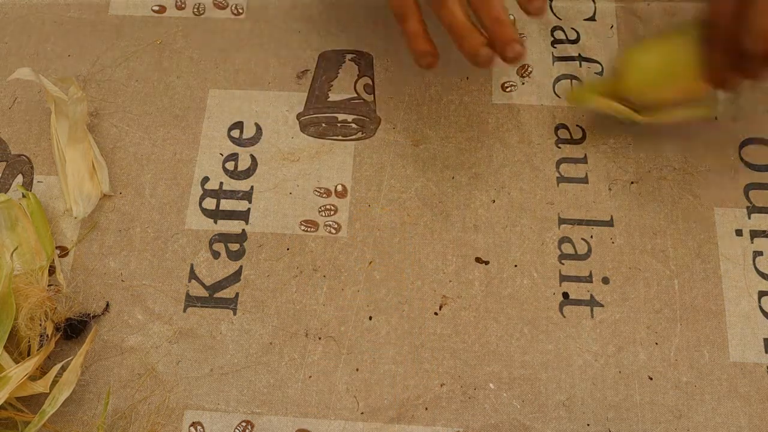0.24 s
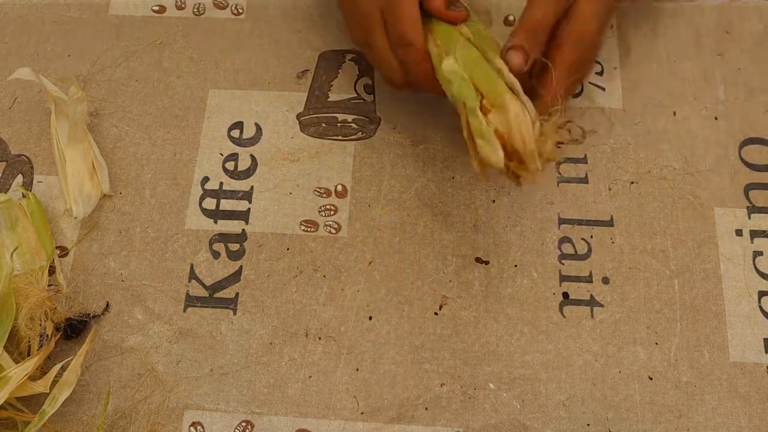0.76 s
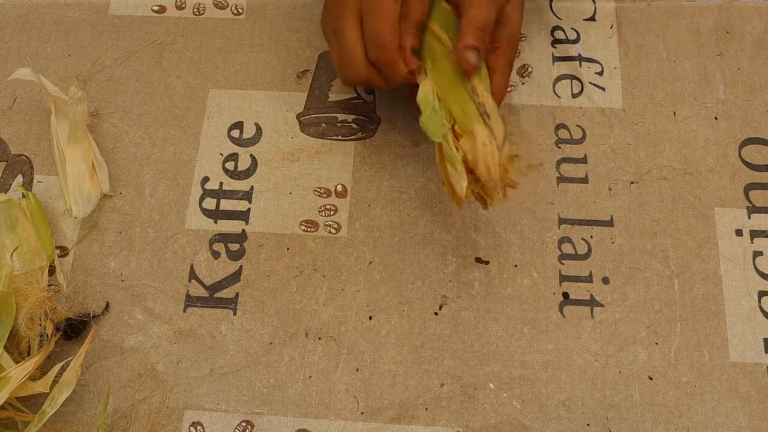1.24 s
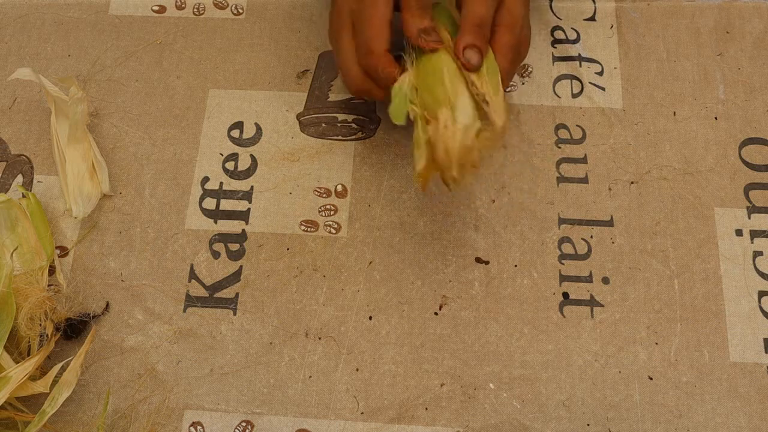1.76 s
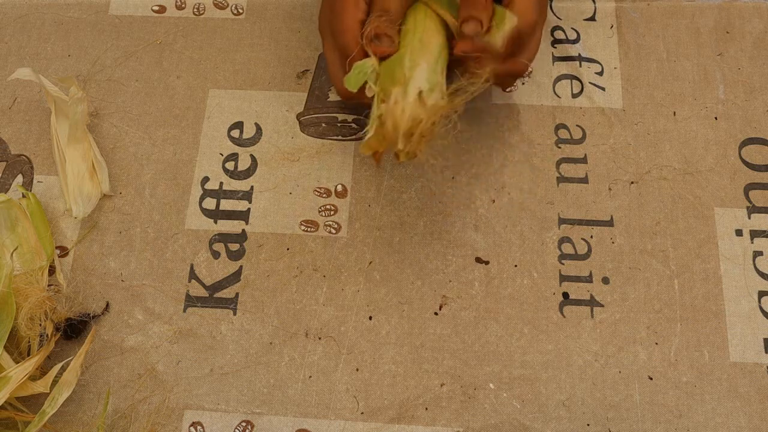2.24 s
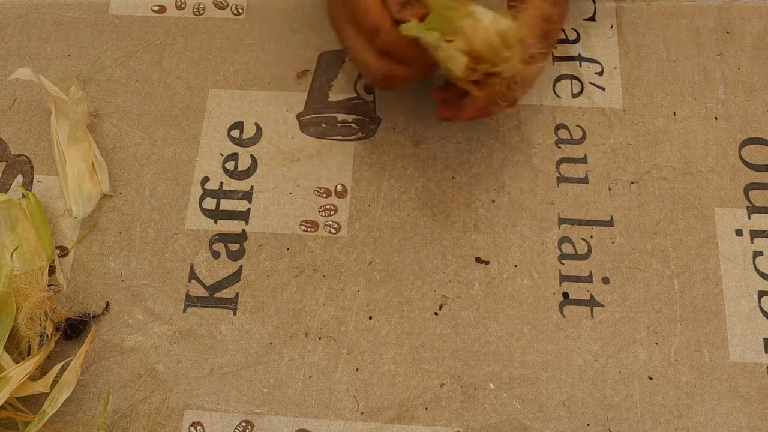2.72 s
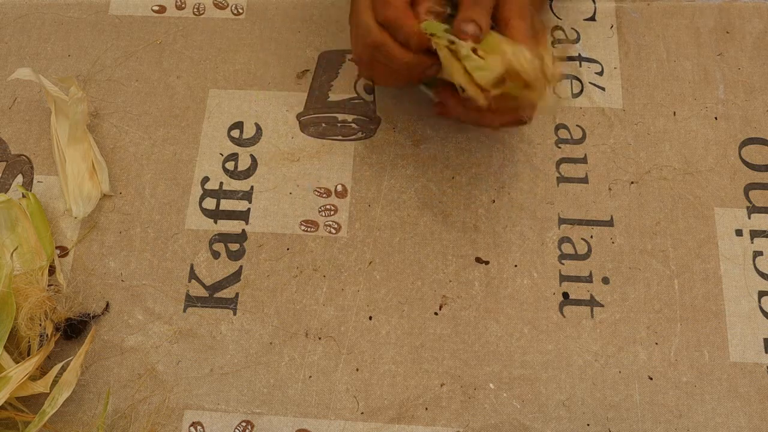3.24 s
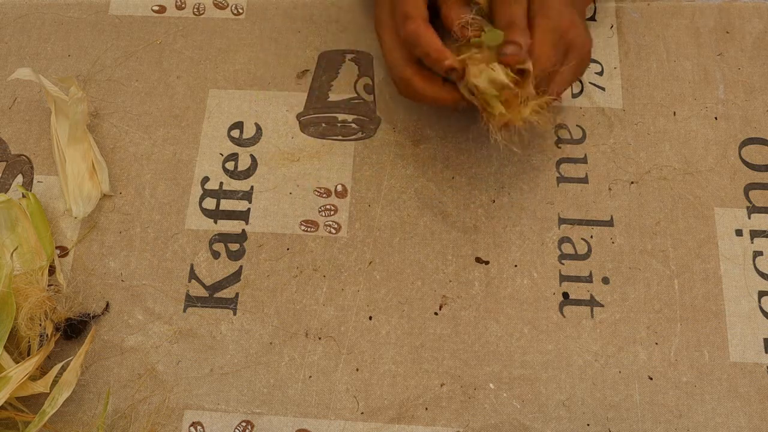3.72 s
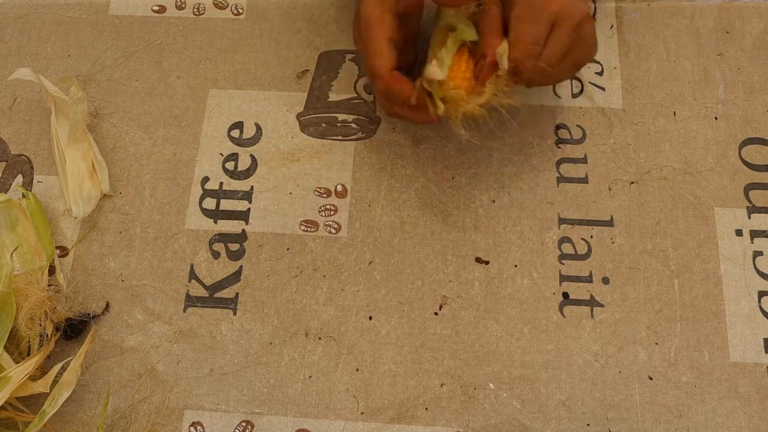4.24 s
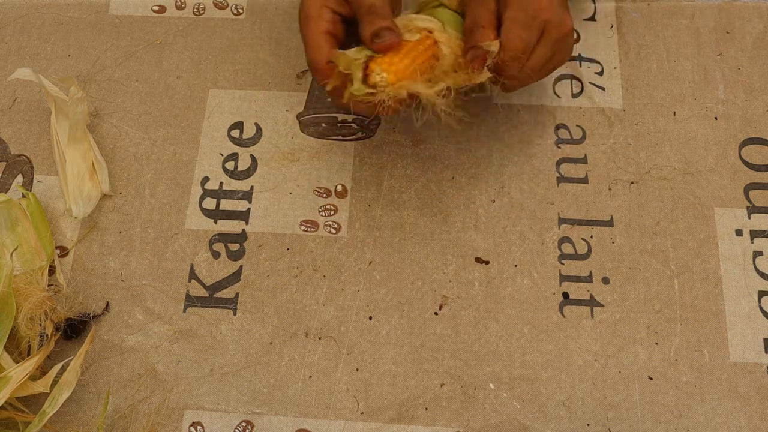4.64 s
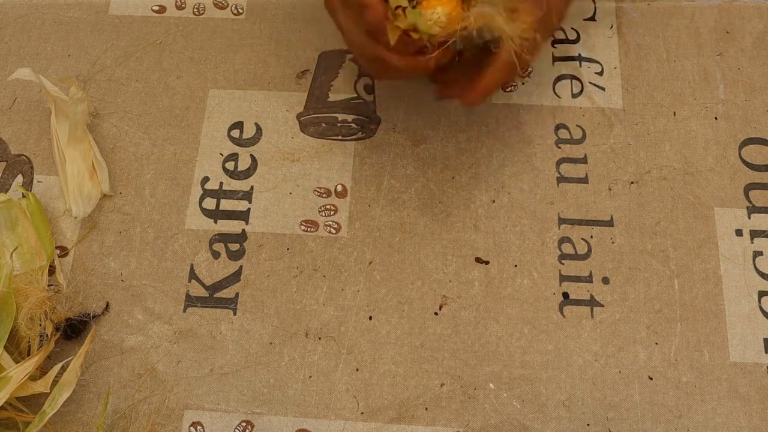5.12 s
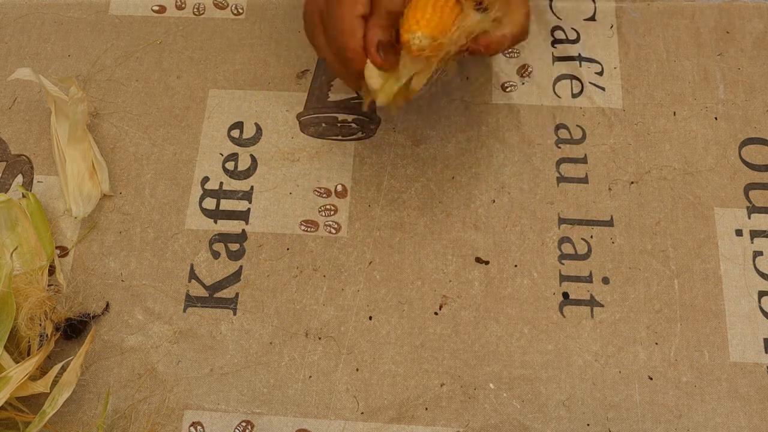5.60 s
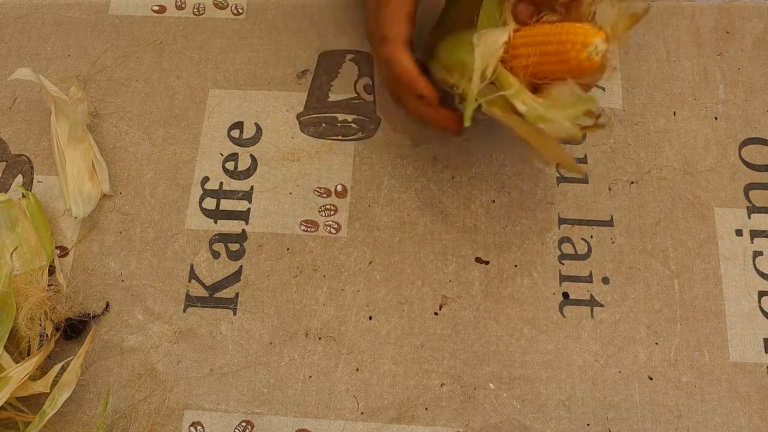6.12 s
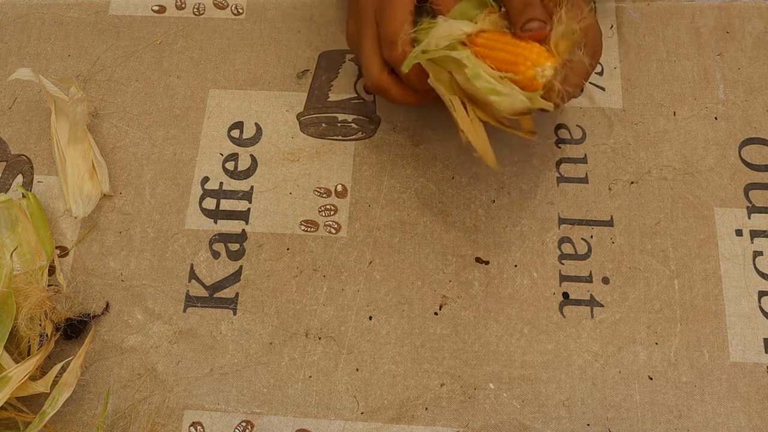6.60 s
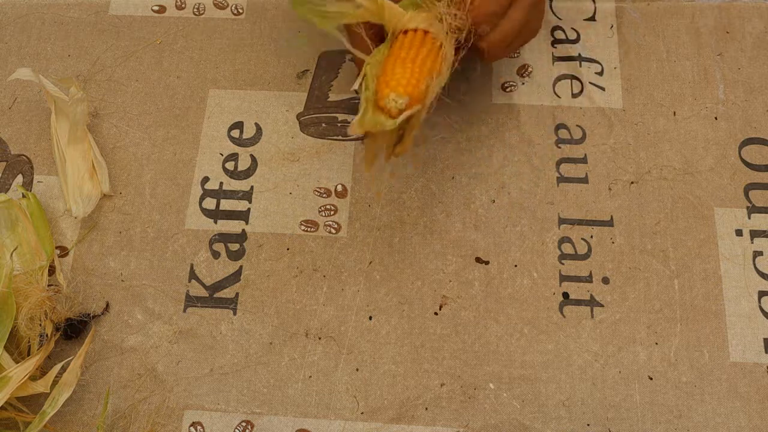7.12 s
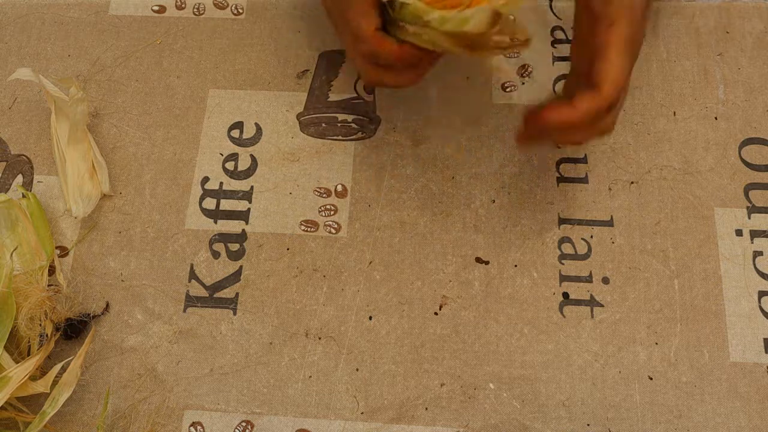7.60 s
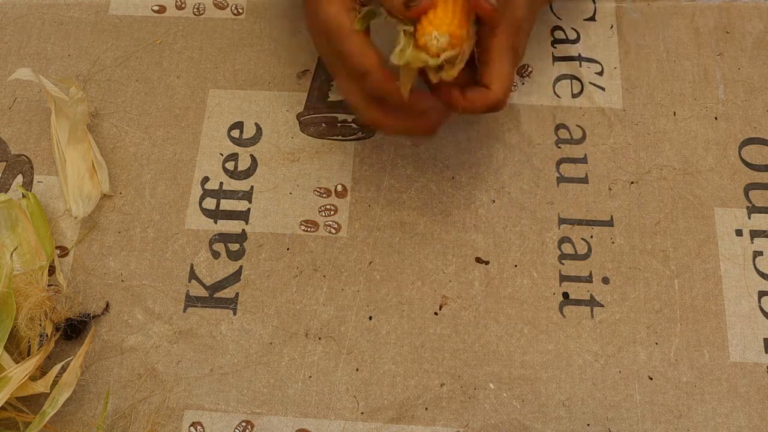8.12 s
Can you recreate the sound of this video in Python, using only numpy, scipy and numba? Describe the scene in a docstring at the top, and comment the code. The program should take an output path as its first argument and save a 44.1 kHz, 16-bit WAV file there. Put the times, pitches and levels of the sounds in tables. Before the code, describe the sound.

Close, crisp leafy crackling in uneven pulls, stiff husk veins snapping loudly now and then, faint low thuds from wrists on a table, indoors.

```python
"""Dry husks rustle, crackle and snap as hands peel a corn cob above a table, close up in a quiet room.
Thousands of tiny fibre cracks make the rustle, and the cupped leaves ring near 1 kHz as resonant noise.
Stiff veins snap as noise bursts with short rings; ticks are tiny wavelets, scrapes and a tear filtered hiss.
Wrists knock the table as decaying sines, its frame sways at its lowest mode and rumbles, over room hush."""
import sys
import numpy as np
from scipy import signal
from scipy.fft import rfft, irfft
from scipy.io import wavfile
from scipy.ndimage import uniform_filter1d
from numba import njit

SR = 44100
rng = np.random.default_rng(int(sys.argv[2]) if len(sys.argv) > 2 else 0)


def store_pcm(level_fs):
    """Save levels as 16-bit WAV."""
    pcm = np.round(np.clip(level_fs, -1, 1) * 32767).astype(np.int16)
    wavfile.write(sys.argv[1], SR, np.atleast_2d(pcm).T)


def undo_db(level):
    """Turn decibels back into plain size, where 20 dB means ten times bigger."""
    steps = np.asarray(level, float) / 20
    return 10 ** steps


N = 368235

# brightness given to crackle and snaps: (frequency [Hz], gain [dB])
HUSK_COLOUR = [(180, -33), (400, -2), (1000, -6.5), (2000, -5.5), (3900, 0), (4550, -3), (5900, 0.5),
               (6900, -2.5), (7800, 0), (9500, -5), (10600, -7.5), (12500, -6.5), (15600, -5), (16400, -45)]
# wrists on the table: (time [s], level [dB], struck-spot ring [Hz], t60 [s], board mode over that ring [dB])
WRIST_KNOCKS = [(0.018, -34, 154, 0.094, -9), (.395, -38, 105, 0.11, -28), (.81, -38.5, 96, 0.13, -25),
                (1.826, -30, 249, 0.063, -9), (1.841, -32, 284, 0.1, -15), (1.852, -22.5, 191, 0.08, -11.5),
                (2.526, -29, 600, 0.03, -12), (2.595, -30.5, 397, 0.045, -8),
                (2.969, -25.5, 494, 0.035, -12), (3.928, -35, 137, 0.077, -14),
                (4.057, -33, 108, 0.12, -17), (4.469, -36, 72, 0.12, -31), (4.619, -24, 204, 0.082, -7),
                (5.344, -35, 71, 0.26, -10), (7.102, -24.5, 204, 0.089, -5), (7.238, -34, 280, 0.029, 0.5),
                (7.979, -21, 120, 0.15, -28), (8.028, -29, 80.7, 0.15, -27)]
BOARD_HZ = 331


def level(x, db):
    """Set the rms level."""
    return x * undo_db(db) / np.sqrt(np.mean(x ** 2))


def curve(points):
    """Interpolate the columns of a table sample by sample; the first column is time."""
    s, *columns = np.transpose(points)
    return [np.interp(np.arange(N) / SR, s, c) for c in columns]


def colour(x, points, size=1024):
    """Causal filter through (Hz, dB) points, from the folded cepstrum."""
    hz, db = np.transpose(points)
    bins_hz = np.fft.rfftfreq(size, 1 / SR)
    gain = undo_db(np.interp(np.log(bins_hz + 1), np.log(hz), db))
    ceps = irfft(np.log(gain))
    ceps[1:size // 2] *= 2
    ceps[size // 2 + 1:] = 0
    impulse = irfft(np.exp(rfft(ceps)))
    return signal.fftconvolve(x, impulse)[:len(x)]


def band(x, hz, width_hz):
    """One resonance."""
    return signal.lfilter(*signal.iirpeak(hz, hz / width_hz, fs=SR), x)


def walk(rate):
    """Random levels held 1 / rate s and slewed; spread near 1."""
    hold = int(SR / rate)
    steps = np.repeat(rng.standard_normal(N // hold + 1), hold)
    return uniform_filter1d(steps, hold // 2)[:N]


def add(out, s, sound):
    """Mix a short sound in at time s."""
    i = int(s * SR)
    out[i:i + len(sound)] += sound[:len(out) - i]


def swells(peak_s, rise_s, fall_s, db):
    """Power-summed gain of swells, each 20 dB down one rise before and one fall after its rounded peak."""
    t = np.arange(0, N + 64, 64) / SR
    power = 0
    for s, rise, fall, top_db in np.broadcast(peak_s, rise_s, fall_s, db):
        away = np.abs(t - s) / np.where(t < s, rise, fall)
        power = power + undo_db(top_db - 20 * away ** 1.39) ** 2  # higher exponent = rounder top
    return np.interp(np.arange(N) / SR, t, np.sqrt(power))


@njit
def grains(start, hz, cycles, size):
    """Each crack is a wavelet of a few cycles at its own pitch that swells and dies."""
    out = np.zeros(N + 2000)
    for k in range(len(start)):
        decay = hz[k] / cycles[k] / SR
        turn = np.exp(2j * np.pi * hz[k] / SR - decay)
        z = size[k] + 0j
        for i in range(min(int(8 / decay), 2000)):
            out[start[k] + i] += i * decay * z.imag
            z *= turn
    return out[:N]


@njit
def sweep(x, hz, q):
    """Band-pass whose centre moves: a state-variable filter."""
    y, b, l = np.empty(len(x)), 0., 0.
    for i in range(len(x)):
        g = np.tan(np.pi * hz[i] / SR)
        v = (b + g * (x[i] - l)) / (1 + g * (g + 1 / q))
        b, l, y[i] = 2 * v - b, l + 2 * g * v, v / q
    return y


def cracks(rate, low_hz, high_hz, spread_db, cycles, flurry_db):
    """Fibres crack at random times and pitches, rate per second, in flurries; a few are far larger."""
    when, pitch, chance, length = rng.random((int(rate * N / SR), 4)).T
    start = (when * N).astype(np.int64)
    hz = low_hz + (high_hz - low_hz) * pitch
    size_db = spread_db * np.minimum(-np.log(chance), 4)
    flurry = flurry_db * np.clip(walk(70), -2, 1)[start]
    size = undo_db(size_db + flurry) * np.sqrt(hz)  # offsets the shorter life of high cracks
    return level(grains(start, hz, cycles * (.5 + length), size), 0)


def rubbing(patchy_db):
    """Skin slides on leaf: hiss whose regions of the spectrum come and go apart."""
    patches = 0
    for hz in range(700, 16300, 1300):
        patches = patches + undo_db(patchy_db * walk(11)) * band(rng.standard_normal(N), hz, 1100)
    return level(patches, 0)


def leaf_crackle():
    """Dense fine cracks, rubbing hiss and larger stray ticks, with a bright, notched colour."""
    fine = cracks(rate=4000, low_hz=663, high_hz=16320, spread_db=2.0, cycles=1.44, flurry_db=4.5)
    strays = cracks(rate=60, low_hz=3000, high_hz=14000, spread_db=4.5, cycles=.8, flurry_db=1.5)
    mix = fine + undo_db(-2.0) * rubbing(patchy_db=2.5) + undo_db(-13) * strays
    return level(colour(mix, HUSK_COLOUR), -0.5)


def leaf_hollow():
    """Coarser cracking and noise heard through the leaves' hollow, which retunes as they fold."""
    # ring of the cupped leaves: (time [s], centre before wobble [Hz])
    hollow_tuning = [(0.0, 1290), (1.2, 1260), (1.37, 1000), (1.65, 1460), (2.0, 1080), (2.17, 1420),
                     (2.22, 1780), (2.33, 960), (2.48, 1530), (3.45, 1300), (4.75, 1170), (5.9, 1310),
                     (6.09, 940), (6.4, 1460), (6.7, 1130), (6.84, 810), (7.0, 1690), (8.35, 1520)]
    coarse = cracks(rate=1100, low_hz=507, high_hz=3670, spread_db=3.0, cycles=1.53, flurry_db=2.5)
    coarse = coarse + level(rng.standard_normal(N), 5.8)
    centre_hz = curve(hollow_tuning)[0] * undo_db(1.08 * walk(25))
    hollow = sweep(coarse, centre_hz, 2.33) + undo_db(-15.5) * sweep(coarse, 1.66 * centre_hz, 1.0)
    return undo_db(0.26 * walk(30)) * level(hollow, -0.36)


def rustle():
    """Pulls on the leaves, and the cob turning in the hands between them, drive crackle and hollow ring."""
    # pulls on a leaf: (loudest at [s], rise [s], fall [s], crackle [dB], hollow ring over crackle [dB])
    pulls = [(0.024, 0.014, 0.12, -40, -8), (0.136, 0.12, 0.054, -41.5, -2.5),
             (0.561, 0.046, 0.038, -31.5, -4), (0.715, 0.35, 0.043, -36, -6.5),
             (1.203, 0.18, 0.13, -35.5, -6), (1.37, 0.024, 0.096, -26.5, -3), (1.601, 0.16, 0.07, -35, -6),
             (1.659, 0.039, 0.031, -33, -4), (1.765, 0.13, 0.033, -39.5, -1.5),
             (1.994, 0.087, 0.054, -31.5, 1), (2.172, 0.0073, 0.09, -27.5, 7),
             (2.215, 0.046, 0.22, -28, 3.5), (2.392, 0.0076, 0.09, -36.5, 2),
             (2.481, 0.055, 0.095, -30.5, 0), (2.616, 0.072, 0.12, -24.5, -13),
             (2.76, 0.018, 0.055, -34, -5.5), (2.813, 0.014, 0.016, -29.5, -7.5),
             (2.851, 0.013, 0.19, -34, -5), (3.116, 0.1, 0.023, -33.5, -5.5),
             (3.259, 0.09, 0.13, -36.5, -6), (3.479, 0.17, 0.13, -29, -6), (3.68, 0.045, 0.035, -29, -29),
             (3.775, 0.25, 0.23, -31.5, -8), (3.923, 0.014, 0.078, -30, -3.5), (4.27, 0.14, 0.35, -35, -15),
             (4.5, 0.037, 0.083, -36, -22), (4.776, 0.18, 0.15, -28, -4), (4.892, 0.019, 0.48, -34.5, -9),
             (5.098, 0.062, 0.13, -28.5, -7), (5.344, 0.086, 0.044, -26, -16), (5.409, 0.16, 0.31, -35, -2),
             (5.603, 0.13, 0.057, -32.5, -5), (5.681, 0.099, 0.12, -31.5, -7.5),
             (5.873, 0.14, 0.059, -28.5, -4), (6.066, 0.0078, 0.13, -28.5, -5.5),
             (6.303, 0.14, 0.11, -30, -8.5), (6.486, 0.11, 0.19, -31, -8), (6.599, 0.01, 0.13, -30.5, -0.5),
             (6.829, 0.097, 0.073, -26.5, -2), (6.9, 0.055, 0.049, -30.5, -1.5),
             (7.05, 0.23, 0.19, -34.5, -8.5), (7.277, 0.17, 0.0086, -37, -10),
             (7.396, 0.1, 0.029, -36.5, -5), (7.492, 0.046, 0.023, -27, -7),
             (7.54, 0.069, 0.031, -26.5, -14), (7.665, 0.16, 0.04, -32.5, -35),
             (7.735, 0.092, 0.026, -35, -12), (7.916, 0.017, 0.12, -32, -3.5),
             (8.105, 0.17, 0.067, -31, -8.5), (8.175, 0.022, 0.055, -27.5, -12),
             (8.325, 0.015, 0.273, -35, -5.5)]
    # cob turning in the hands between pulls: (time [s], crackle [dB])
    holding_levels = [(0, -47.5), (0.45, -58), (1.5, -50), (2.1, -48), (2.9, -53.5), (3.2, -44.5),
                      (4.05, -42), (4.5, -50), (5.95, -46), (6.05, -39.5), (7, -42.5), (7.85, -47.5),
                      (8.35, -51.5)]
    s, rise, fall, db, hollow_db = np.transpose(pulls)
    holding = undo_db(curve(holding_levels)[0])
    crackle_gain = np.hypot(swells(s, rise, fall, db), holding)
    hollow_gain = np.hypot(swells(s, rise, fall, db + hollow_db), holding * undo_db(-3))
    grip = undo_db(1.2 * walk(24))  # fingers slip and catch
    return grip * (crackle_gain * leaf_crackle() + hollow_gain * leaf_hollow())


def snaps():
    """A vein breaks: a sharp crack, a few cycles of the leaf's ring, then a spray of after-cracks."""
    # breaking veins: (time [s], level [dB], ring [Hz], sharp crack over the ring [dB])
    veins = [(0.14, -23, 2230, 2), (0.521, -20.5, 1080, -1), (0.557, -17, 1780, -6),
             (0.854, -13.5, 1440, -32), (0.961, -26.5, 860, -8), (1.052, -26.5, 1490, 2.5),
             (1.361, -17, 2420, -17), (1.37, -2, 986, -14), (1.383, -10.5, 1405, -5),
             (1.723, -13, 3900, -17), (1.953, -24, 1290, 5), (1.995, -20, 1240, -7),
             (2.172, -9.5, 1370, -12), (2.598, -11.5, 1030, -6), (2.618, -6.5, 2420, -23),
             (2.704, -16.5, 1330, -9), (2.812, -23, 1450, -2), (2.905, -25.5, 1320, 0.5),
             (2.974, -21, 990, -17), (3.402, -20, 1520, -18), (3.418, -17, 1360, -12),
             (3.455, -15, 1370, -20), (3.469, -16, 1450, -12), (3.482, -26, 1270, -15),
             (3.923, -20.5, 1180, 2), (4.256, -23, 1190, 3), (4.398, -10, 3750, -12),
             (4.499, -6.5, 4230, -9.5), (4.544, -12.5, 4140, -8.5), (4.55, -15, 1400, -15),
             (4.633, -29.5, 1350, 7.5), (4.723, -18, 1090, -17), (4.997, -13, 1370, -4),
             (5.157, -18, 2140, 2.5), (5.395, -12, 1190, 2), (5.819, -18, 4100, 1.5), (5.836, -18, 3320, 8),
             (5.863, 0, 3900, 0.5), (5.869, -4, 1760, -7), (6.062, -9.5, 955, -2), (6.071, -17, 990, 0.5),
             (6.119, -18, 3910, 2), (6.464, -18.5, 2800, 5), (6.499, -14.5, 1560, -15),
             (6.717, -14, 1460, -8), (6.899, -16, 1400, -5), (7.946, -22, 1670, 2.5)]
    # modes of a snapped leaf: (pitch ratio, level [dB], fade to 1/e [cycles])
    leaf_modes = [(1, 0, 1.8), (1.6, -2, 1.47), (2.5, -10, 2.3)]
    crack, ring = np.zeros(N), np.zeros(N)
    t = np.arange(int(.05 * SR)) / SR
    rip = np.exp(-t / 0.00069) * (1 - np.exp(-t / 0.00048))
    after = undo_db(-17) * np.exp(-t / .004)
    onset = 1 - np.exp(-t / 0.00015)
    for s, db, hz, crack_db in veins:
        noise, spray = rng.standard_normal((2, len(t)))
        noise = noise * np.sqrt(np.sum(rip ** 2) / np.sum((noise * rip) ** 2))  # equal energy each time
        add(crack, s, undo_db(db + crack_db) * noise * (2 * rip + after * spray ** 2))
        for ratio, mode_db, fade in leaf_modes:
            cycles = ratio * hz * t
            add(ring, s, undo_db(db + mode_db) * np.exp(-cycles / fade) * onset * np.sin(2 * np.pi * cycles))
    click = np.zeros(1024)
    click[0] = 1
    colour_gain = np.sqrt(np.sum(colour(click, HUSK_COLOUR) ** 2))
    thin = signal.butter(2, 420, "high", fs=SR, output="sos")  # snaps carry little bass
    return signal.sosfilt(thin, colour(crack, HUSK_COLOUR) / colour_gain + ring)


def ticks():
    """Single stiff fibres let go: needle-sharp bright clicks under a cycle long, each at its own pitch."""
    # fibres letting go: (time [s], level before 7 dB of gain [dB])
    fibres = [(2.952, -14.5), (3.481, -12), (3.4974, -16), (3.7444, -17), (3.756, -15), (3.7885, -18),
              (4.161, -18), (4.229, -19), (5.308, -12), (5.332, -12), (5.7713, -14.5), (5.86, -6),
              (5.8724, -2), (5.875, -5.5), (7.548, -12), (8.169, -15), (8.1713, -25)]
    s, db = np.transpose(fibres)
    hz = 9600 * undo_db(2.5 * rng.uniform(-1, 1, len(s)))
    return grains((s * SR).astype(np.int64), hz, np.full(len(s), 0.82), undo_db(db + 7))


def grit():
    """Grainy hiss of leaf dragging on leaf: noise with a fast random level."""
    return rng.standard_normal(N) * undo_db(4.1 * walk(180))


def scrapes():
    """A leaf edge scrapes along another and sings: grainy hiss through a narrow resonance."""
    # singing edges: (loudest at [s], rise and fall [s], resonance [Hz], level [dB])
    edges = [(3.48, .06, 5400, -32), (6.835, 0.035, 5230, -29), (6.65, .04, 4970, -34),
             (7.06, .03, 5150, -38), (7.26, .03, 5500, -43), (7.49, 0.027, 3600, -31),
             (7.535, .025, 8000, -33), (7.62, 0.044, 3800, -36.5), (7.66, 0.045, 6540, -35)]
    hiss = grit()
    out = np.zeros(N)
    for s, half, hz, db in edges:
        out += swells([s], half, half, db) * level(band(hiss, hz, hz / 11), 0)  # Q of 11
    return out


def tear():
    """One leaf rips lengthwise: grainy hiss through a wide resonance, quick to rise and slow to fall."""
    return swells([2.19], .022, .22, -27) * level(band(grit(), 2900, 2400), 0)


def knocks():
    """Soft knocks ring the struck spot and the board's own mode as decaying sines."""
    out = np.zeros(N)
    t = np.arange(int(.4 * SR)) / SR
    board = np.sin(2 * np.pi * BOARD_HZ * t)
    for s, db, hz, t60, board_db in WRIST_KNOCKS:
        fade = np.exp(-np.log(1000) * t / t60) * (1 - np.exp(-t / 0.0027))
        add(out, s, undo_db(db + 5.0) * fade * (np.sin(2 * np.pi * hz * t) + undo_db(board_db) * board))
    return out


def wrist_drag():
    """The wrist slides in and rolls off around each knock: noise through the board's mode."""
    s, db, _, t60, board_db = np.transpose(WRIST_KNOCKS)
    drag = band(rng.standard_normal(N), BOARD_HZ, 260) * undo_db(2 * walk(40))
    return swells(s, 0.055, 2 * t60, db + board_db - 7) * level(drag, 0)


def frame_sway():
    """Arms lean on the table and its frame shakes at its lowest mode, a wavering low sine."""
    # arms leaning: (strongest at [s], sway [dB], fall [s])
    leans = [(1.55, -53, .3), (3.21, -42.5, 0.21), (3.45, -55, 0.43), (3.87, -45, 0.45),
             (4.11, -35.5, 0.18), (4.5, -49, .25), (4.88, -41.5, 0.39), (5.2, -40, 0.082),
             (5.45, -28.5, 0.16), (6.42, -50, 0.29), (7.55, -39.5, 0.36), (8.08, -30.5, 0.19)]
    s, db, fall = np.transpose(leans)
    lean = np.hypot(swells(s, .13, fall, db), undo_db(-63))  # never quite still
    shake_hz = 36 * (1 + .05 * walk(10))
    sway = np.sin(2 * np.pi * np.cumsum(shake_hz) / SR) * undo_db(2 * walk(9))
    return lean * level(sway, 0)


def frame_rumble():
    """The frame rumbles under the arms: noise through two broad low resonances, unsteady in level."""
    # rumble of the frame: (time [s], level [dB])
    rumble_levels = [(0, -42), (.15, -50.5), (.9, -52), (1.2, -55), (3., -52), (4., -50), (5.4, -47),
                     (5.9, -55), (8.35, -53.5)]
    rumble = band(band(rng.standard_normal(N), 70, 109), 84, 165) * undo_db(4.5 * walk(19))
    return undo_db(curve(rumble_levels)[0]) * level(rumble, 0)


def room(x, t60, wet_db):
    """A short tail from the table top and nearby walls: decaying noise after a 4 ms gap."""
    t = np.arange(int(.4 * SR)) / SR
    tail = band(rng.standard_normal(len(t)), 870, 5600) * np.exp(-np.log(1000) * t / t60) * (t > .004)
    tail = undo_db(wet_db) * tail / np.sqrt(np.sum(tail ** 2))
    return x + signal.fftconvolve(x, tail)[:N]


def hush():
    """Room air and microphone hiss: steady coloured noise."""
    # spectrum of the hush: (frequency [Hz], relative density [dB])
    hush_colour = [(15, -24), (25, -5), (65, 2.5), (375, 5.5), (1450, 0.5), (1910, -26), (7800, -21),
                   (10800, -24), (14500, -9), (16200, -28)]
    return level(colour(rng.standard_normal(N), hush_colour, size=4096), -53.5)


def scene():
    """Husks with the room's tail, the table beneath them and the hush."""
    husks = rustle() + snaps() + ticks() + scrapes() + tear()
    table = knocks() + wrist_drag() + frame_sway() + frame_rumble()
    return (room(husks, t60=0.021, wet_db=-20.0) + table + hush())[None]


def top_cut(x):
    """Nothing passes above the cut-off."""
    return signal.sosfilt(signal.butter(12, 16450, fs=SR, output="sos"), x)


def record(dry):
    """Peaks are clipped at full scale and the top is cut steeply above 16.45 kHz."""
    cut = signal.ellip(10, .2, 80, 16450, fs=SR, output="sos")
    mix = signal.sosfilt(cut, np.clip(dry, -1, 1))
    return top_cut(mix)


dry = scene()
out = record(dry)
store_pcm(out)
```